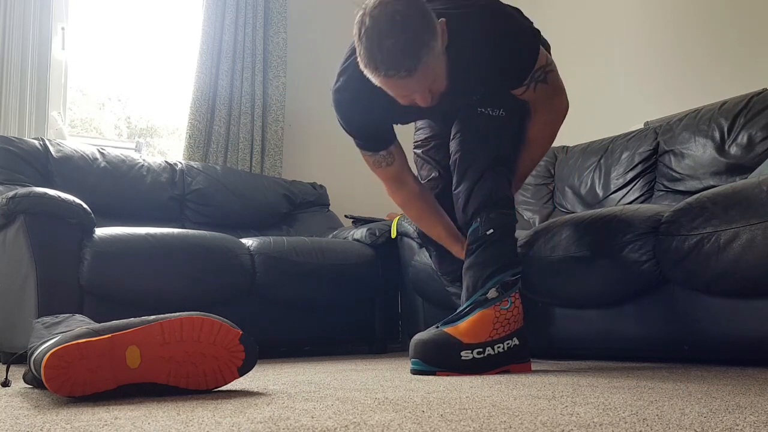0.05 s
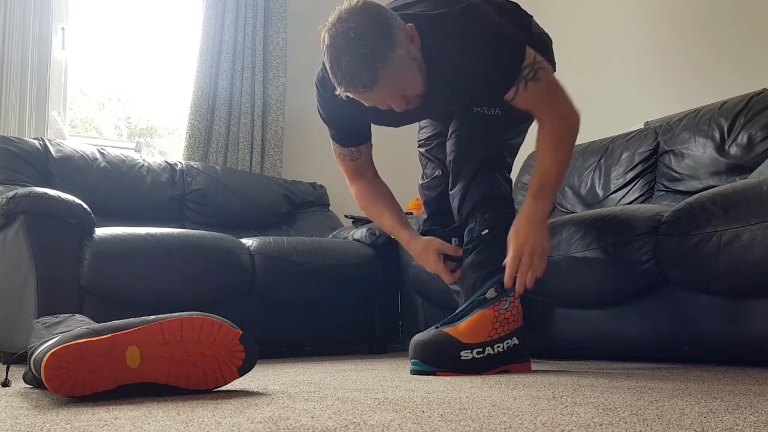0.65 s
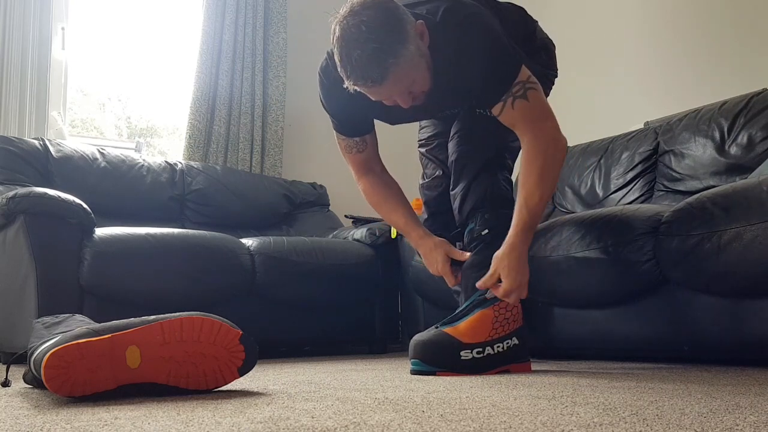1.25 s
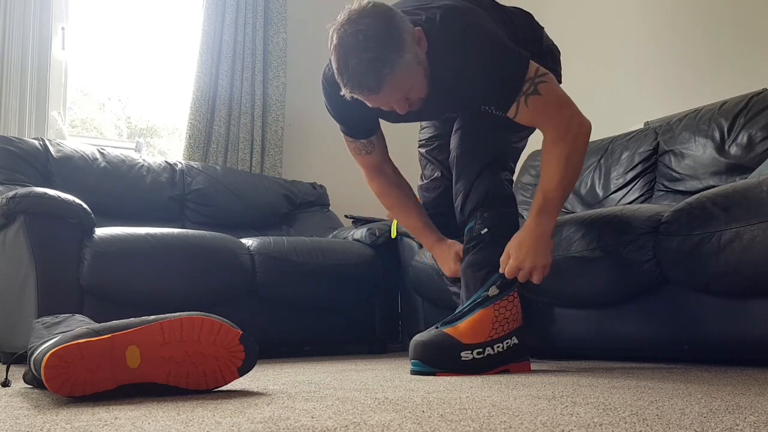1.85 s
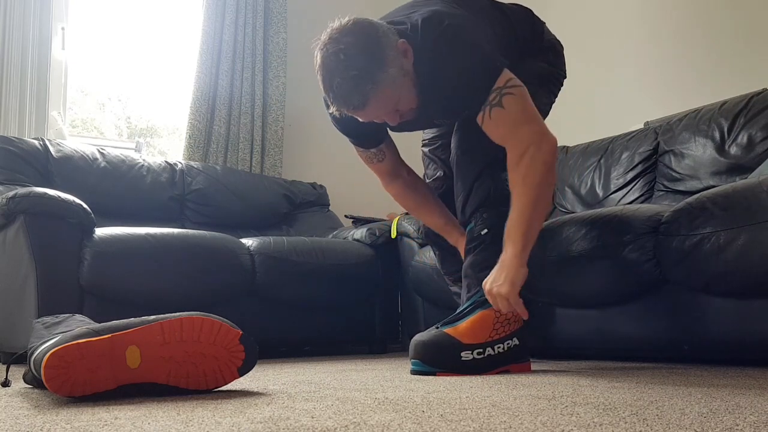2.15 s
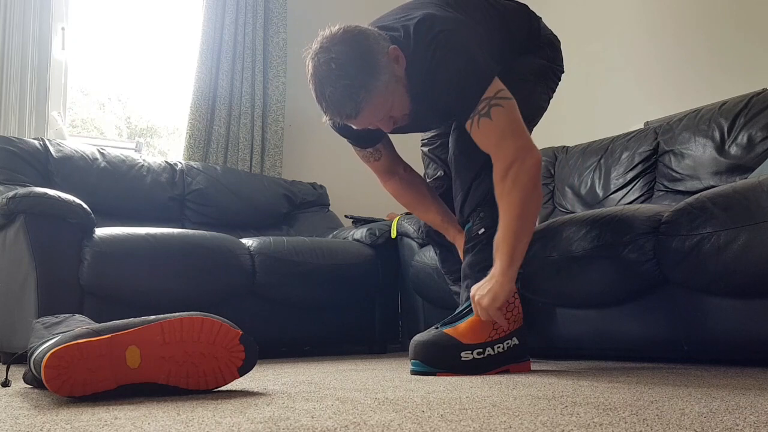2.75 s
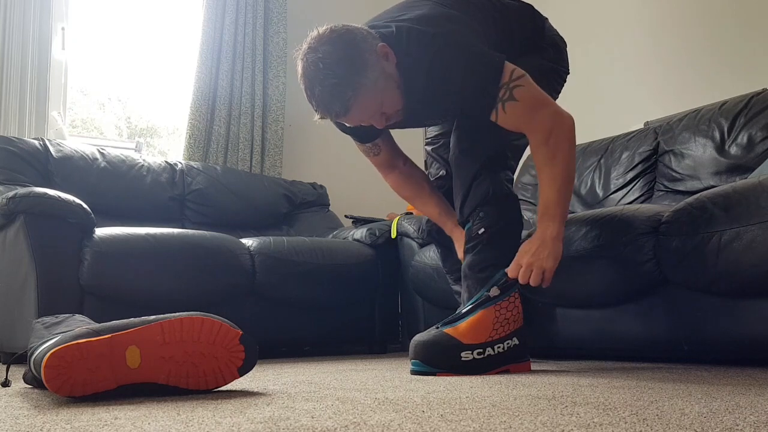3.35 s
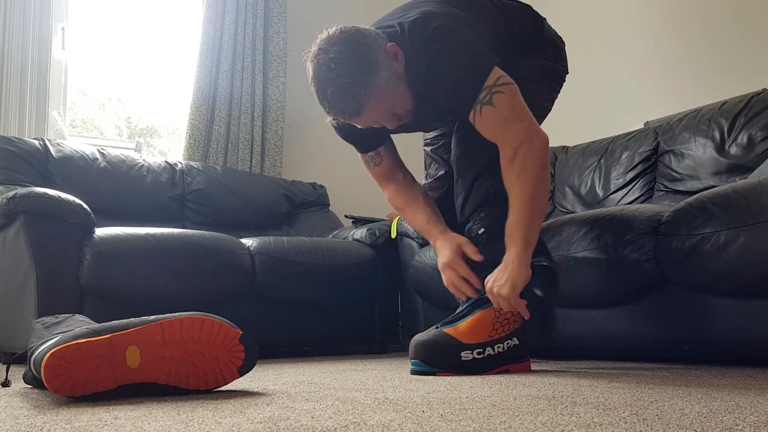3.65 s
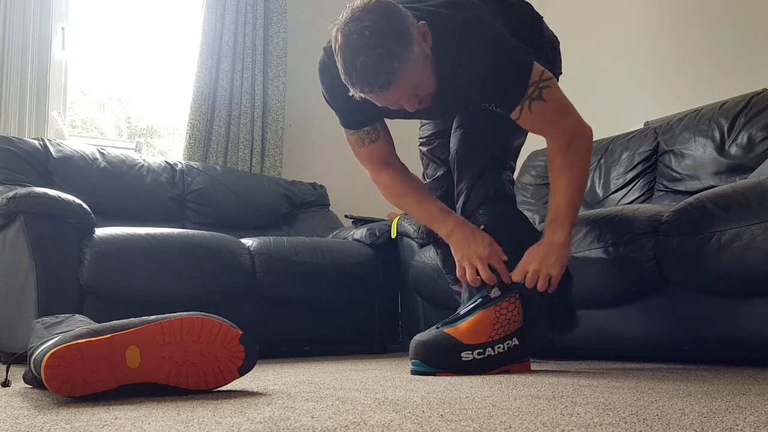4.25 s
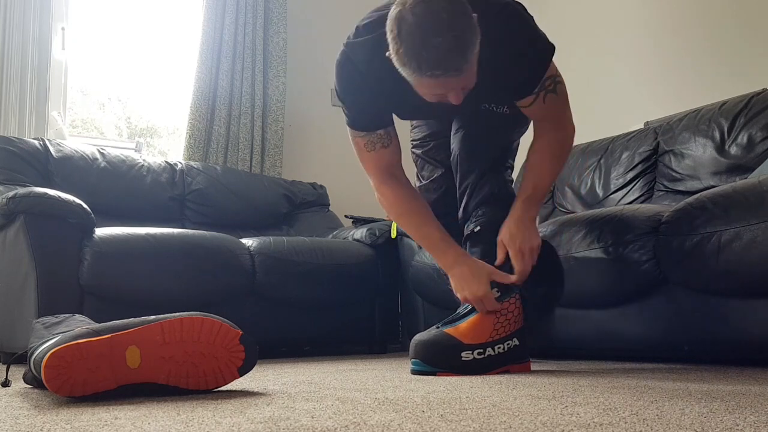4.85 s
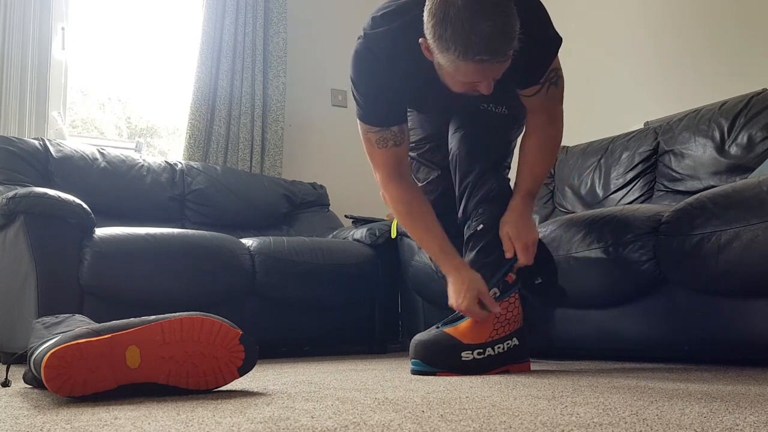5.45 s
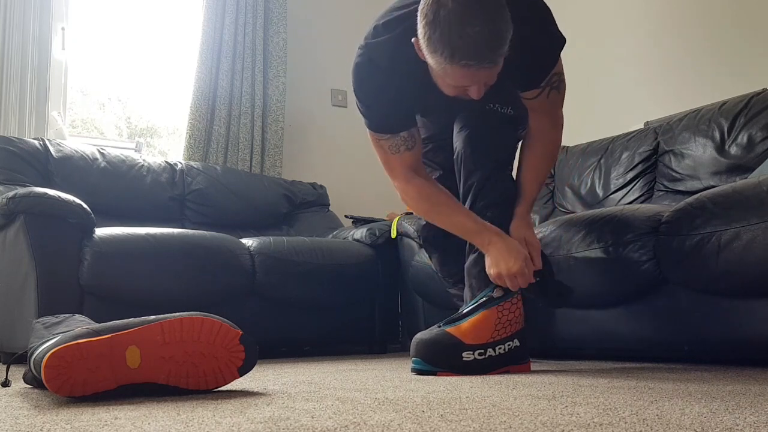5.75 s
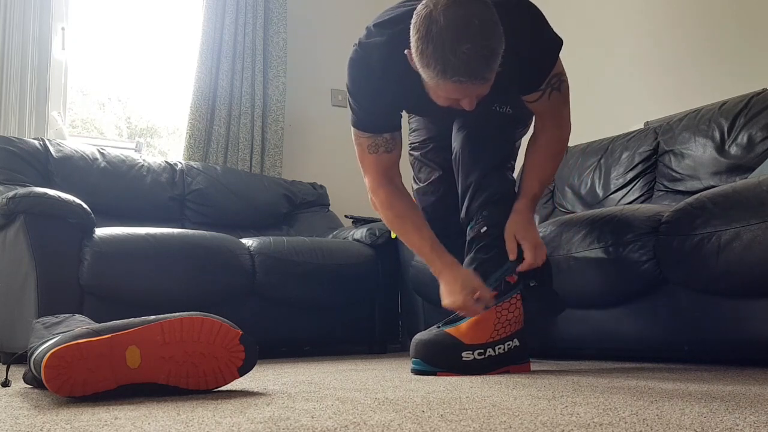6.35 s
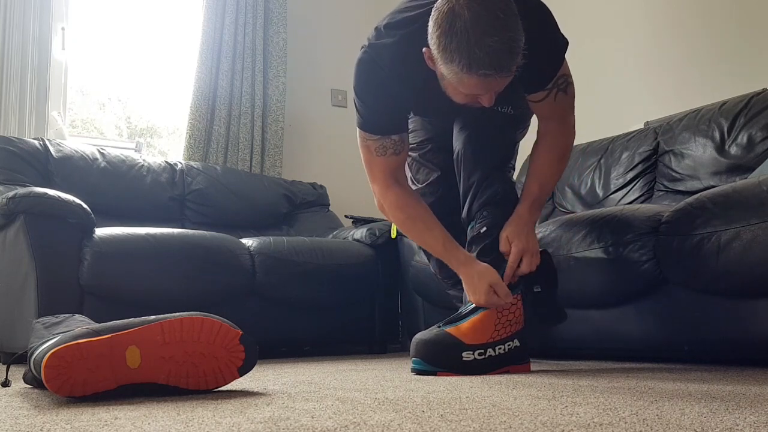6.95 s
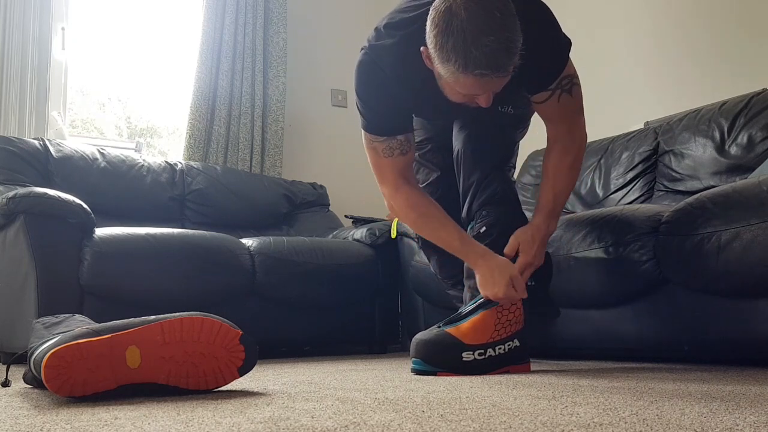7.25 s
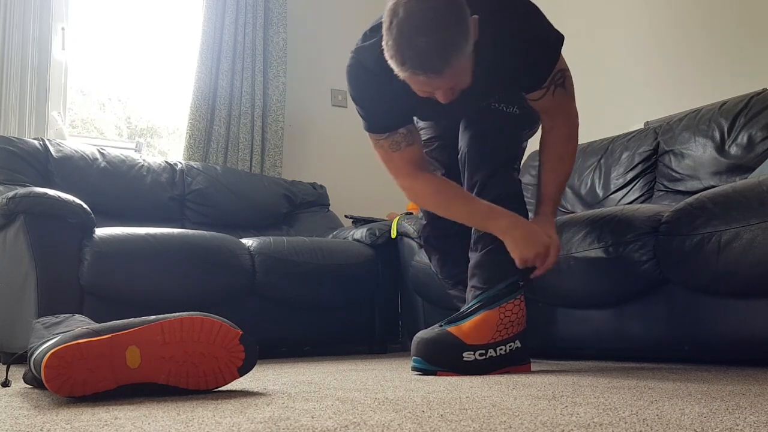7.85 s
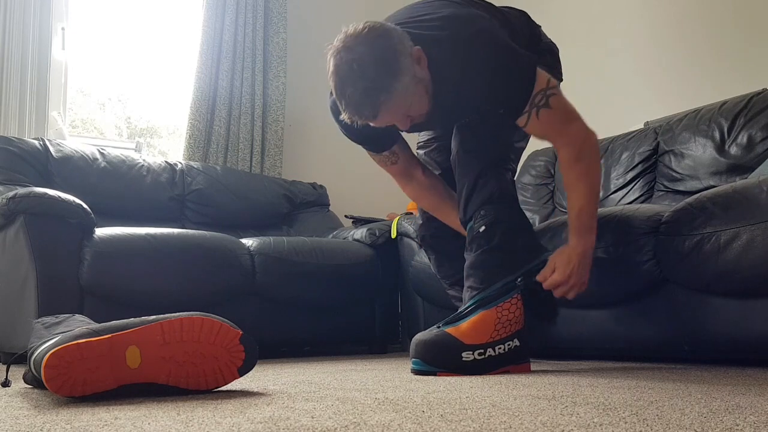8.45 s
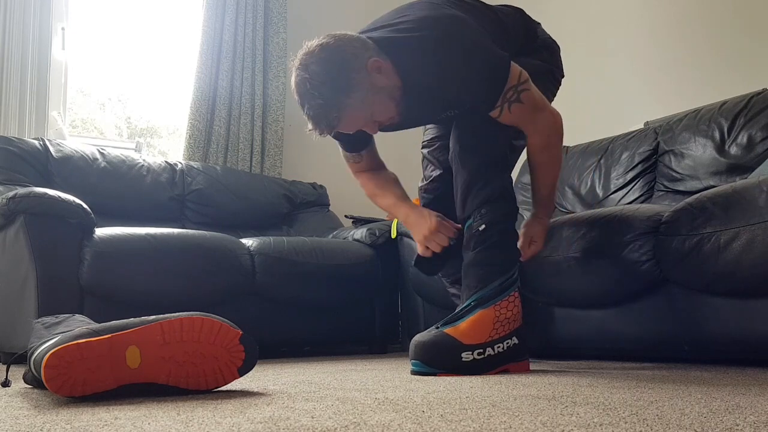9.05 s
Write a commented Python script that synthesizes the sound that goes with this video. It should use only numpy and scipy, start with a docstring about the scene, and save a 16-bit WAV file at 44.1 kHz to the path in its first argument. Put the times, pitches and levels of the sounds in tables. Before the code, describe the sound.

A heavy boot is fastened a step or two from the microphone in a quiet living room, over a faint rumble and thin hiss. Trouser fabric rustles at the start, with a small creak at 0.4 seconds and light finger taps around 1 second. A quieter stretch holds soft taps and tiny zip runs between 1.7 and 2.5 seconds. Short thudding, rasping tugs come from 2.8 to 3.3 seconds, ending with another zip tick. From 3.7 to 5.5 seconds cloth swishes, hands rub and the hollow shell knocks, most clearly near 4.8. Hard tugs with squeaky leather creaks hit at 6.2 seconds, loudest at 6.7, and again around 7.5 with a sharp knock and a low shift of weight. Rustling continues, and from 8.5 to 9 seconds come more tugs, rubbing, low shuffling and a run of groaning creaks.

```python
"""A carpeted living room: someone fastens a heavy mountaineering boot a step or two from the microphone.
Trouser legs and gaiter rustle and swish, with now and then a faint breath; fingers rub and tap the hollow
shell. Foot and body shift against the floor and a leather sofa; boot and sofa leather creak under strain. A zip
ticks in short runs. Hard tugs stick and slip, so the stiff boot judders, thuds and rasps. Under it all lie a
low house rumble and a thin hiss."""
import sys
import numpy as np
from scipy import signal
from scipy.fft import rfft, irfft
from scipy.io import wavfile
from scipy.ndimage import uniform_filter1d

SR = 44100
rng = np.random.default_rng(int(sys.argv[2]) if len(sys.argv) > 2 else 0)


def pcm_store(signal):
    """Save signal as 16-bit PCM."""
    levels = np.round(np.clip(np.atleast_2d(signal), -1, 1) * 32767)
    wavfile.write(sys.argv[1], SR, levels.astype(np.int16).T)


N = 400869


def amp(db):
    return np.exp(np.asarray(db) * (np.log(10) / 20))


def unit_rms(x):
    return x / np.sqrt(np.mean(x ** 2) + 1e-30)


def curve_at(points, hz):
    """Interpolate (f/Hz, value) points over log frequency."""
    points_hz, values = np.transpose(points)
    return np.interp(np.log(hz + 1), np.log(points_hz + 1), values)


def add(mix, t_s, sound):
    part = mix[:, max(round(t_s * SR), 0):][:, :sound.shape[1]]
    part += sound[:, :part.shape[1]]


def at_level(sound, db, length_s):
    """Scale to the energy of db held for length_s."""
    return sound * amp(db) * np.sqrt(length_s * SR / np.sum(sound.mean(0) ** 2))


def colour(x, spectrum, size=4096):
    """Minimum-phase filter: rings after a click, never before."""
    log_gain = np.log(amp(curve_at(spectrum, abs(np.fft.fftfreq(size, 1 / SR)))))
    impulse = np.fft.ifft(np.exp(np.conj(signal.hilbert(log_gain)))).real
    return signal.oaconvolve(np.float32(x), np.float32(impulse[:size // 2]))[:len(x)]


def ring(x, hz, width_hz, bypass=0):
    """One resonance plus a bypassed share of the drive."""
    b, a = signal.iirpeak(hz, max(hz / width_hz, .5), fs=SR)
    return signal.lfilter(b, a, x) + bypass * x


# Stereo width: f/Hz, side over mid/dB
WIDTH_DB = [(60, -15), (200, -17), (400, -12), (700, -6), (1300, -1.5), (2300, 1), (14000, 1)]

def spread(mid, side):
    """Stereo from two unrelated signals: bass near mono, treble wide."""
    side_gain = amp(curve_at(WIDTH_DB, np.fft.rfftfreq(len(side), 1 / SR)))
    side = irfft(rfft(side) * side_gain, len(side))
    return np.array([mid + side, mid - side])


# Room decay: f/Hz, T60/s
ROOM_T60_S = [(60, 0.1), (150, 0.39), (280, 0.44), (600, 0.18), (1400, 0.36), (5000, 0.5), (14000, 0.04)]

def room(x, wet_db, size=10240, build_s=0.00097):
    """Direct sound plus a diffuse tail, new on each call: the paths change as the body moves."""
    hz, t_s, noise = signal.stft(rng.standard_normal((2, size)), SR, nperseg=256)
    decay = amp(-60 * t_s / curve_at(ROOM_T60_S, hz)[:, None])
    tails = signal.istft(noise * decay, SR, nperseg=256)[1]
    tails *= 1 - np.exp(-np.arange(size) / SR / build_s)
    paths = amp(wet_db) * spread(*tails) / np.linalg.norm(tails[0])
    paths[:, 0] += 1
    return signal.oaconvolve(np.float32(x[None]), np.float32(paths), axes=1)[:, :len(x)]


def grains(per_s, spread_db):
    """Tiny random catches and releases, a few far larger than the rest."""
    strength = amp(spread_db * np.minimum(rng.exponential(1, N), 4)) * rng.choice([-1, 1], N)
    return strength * (rng.random(N) < per_s / SR)


def moves(rows, release_s, rise_share=0.55):
    """Gain from rows (t/s, length/s, level/dB): each move gathers speed, holds, settles."""
    t_s = np.arange(0, N, 64) / SR
    start_s, length_s, db = np.transpose(rows)[:, :, None]
    rise = np.clip((t_s - start_s) / (rise_share * length_s), 0, 1)
    settle = np.exp(-np.maximum(t_s - start_s - length_s, 0) / release_s)
    return np.interp(np.arange(N) / SR, t_s, np.linalg.norm(amp(db) * rise * settle, axis=0))


def fidgeting(still_at_s=1.34, resumed_after_s=0.26):
    """Gain of the slight motion between moves; zero while the body holds still."""
    return np.clip(2 * abs(np.arange(N) / SR - still_at_s) / resumed_after_s - 1, 0, 1)


def friction(motion, spectrum, per_s, spread_db, flutter_db, wet_db):
    """Grains under fluttering pressure; four sets of echoes crossfade as the limbs move."""
    pressure = unit_rms(uniform_filter1d(uniform_filter1d(rng.standard_normal(N), 700), 400))
    rub = colour(grains(per_s, spread_db) * amp(flutter_db * pressure), spectrum)
    turns = np.arange(N) / SR * 2
    fades = (np.maximum(np.cos(2 * np.pi * (turns + k / 4)), 0) for k in range(4))
    sound = sum(room(rub * fade, wet_db) for fade in fades)
    power = uniform_filter1d(uniform_filter1d(sound.mean(0) ** 2, 3000), 2000)
    return motion * sound / np.sqrt(abs(power) + 1e-30)  # motion alone sets the slow level


def slips(length_s, per_s, jitter, uneven_db, build_s, release_s=0.006, size=12288):
    """Stick-slip: a half-regular train of jerks that builds, holds and lets go."""
    gaps, strengths = rng.standard_normal((2, size // 40))
    t_s = np.cumsum(np.exp(jitter * gaps)) / per_s
    t_s -= t_s[0]
    force = amp(uneven_db * strengths) * (1 - np.exp(-(t_s + 1 / per_s) / build_s))
    force *= np.exp(-np.maximum(t_s - length_s, 0) / release_s)
    inside = (t_s * SR < size) & (t_s < length_s + 20 * release_s)
    return np.bincount((t_s[inside] * SR).astype(int), force[inside], size)


# Hand strokes, dragging cloth and rubbing the boot: t/s, length/s, cloth/dB, rub/dB
HAND_STROKES = [(-0.03, 0.11, -59, -65), (0.139, 0.18, -57.5, -58), (0.302, 0.14, -54.5, -65.5),
                (0.452, 0.13, -60, -68.5), (0.741, 0.079, -69, -65), (0.9, 0.17, -71.5, -59.5),
                (1.444, 0.14, -82, -68.5), (1.544, 0.2, -70.5, -69.5), (1.85, 0.065, -76, -70),
                (2.02, 0.074, -71.5, -70.5), (2.132, 0.083, -66.5, -80), (2.377, 0.16, -74, -74),
                (2.77, 0.019, -67.5, -71), (3.282, 0.097, -69, -59.5), (3.534, 0.29, -65.5, -76.5),
                (3.755, 0.11, -55, -55.5), (3.86, 0.12, -63.5, -51.5), (3.99, 0.11, -68, -68),
                (4.066, 0.18, -57.5, -53), (4.25, 0.22, -67.5, -72.5), (4.5, 0.11, -57, -62),
                (4.568, 0.19, -58, -58), (4.784, 0.2, -53, -51), (5.013, 0.088, -57.5, -51.5),
                (5.329, 0.34, -64, -70), (5.533, 0.2, -71.5, -64.5), (5.93, 0.13, -66.5, -78),
                (6.226, 0.053, -53, -48.5), (6.406, 0.12, -63, -66), (7.104, 0.14, -62.5, -57),
                (7.273, 0.13, -70, -67), (7.459, 0.27, -55.5, -47), (7.788, 0.11, -54, -55.5),
                (7.978, 0.048, -59, -58.5), (8.112, 0.06, -65, -56), (8.298, 0.2, -66.5, -70.5),
                (8.576, 0.3, -69.5, -52.5), (8.803, 0.28, -59.5, -50)]
# Rustle spectrum: f/Hz, level/dB
CLOTH_DB = [(500, -7), (1500, 1.5), (2500, 2.5), (4000, 2), (6600, 3), (8200, -6), (11000, -3),
            (14500, -7.5)]

def cloth(catches_per_s=22, catch_db=4.5, relax_s=0.055, rest_db=-76):
    """Fibres flick with each stroke and tug; folds catch, flare and relax."""
    slides = [(t_s, length_s, db) for t_s, length_s, db, _ in HAND_STROKES]
    flicks = [(t_s, length_s, -64 + 0.88 * (rasp_db + 46.5)) for t_s, length_s, *_, rasp_db in BOOT_TUGS]
    motion = np.hypot(moves(slides + flicks, release_s=0.064), amp(rest_db) * fidgeting())
    catches = (rng.random(N) < catches_per_s / SR) * rng.random(N)
    strain = signal.lfilter([1], [1, -np.exp(-1 / (relax_s * SR))], catches)
    flare = amp(catch_db * (strain - uniform_filter1d(strain, 5000)))
    mid, side = (unit_rms(colour(grains(per_s=16000, spread_db=1.5) * flare, CLOTH_DB)) for _ in range(2))
    return motion * spread(mid, side)


# Rub spectrum: f/Hz, level/dB
RUB_DB = [(80, -22), (200, 0), (400, -0.5), (650, 2.5), (950, -3.5), (1650, -7.5), (2200, -20.5),
          (7000, -33)]

def hand_rub(rest_db=-80.5):
    """Fingers drag over the boot with each stroke, faintly in between."""
    rubs = [(t_s, length_s, db) for t_s, length_s, _, db in HAND_STROKES]
    motion = np.hypot(moves(rubs, release_s=0.048), amp(rest_db) * fidgeting())
    return friction(motion, RUB_DB, per_s=600, spread_db=4.0, flutter_db=5.0, wet_db=8.0)


# Shifts of foot or body: t/s, length/s, level/dB
WEIGHT_SHIFTS = [(-0.01, 0.052, -56.5), (.425, 0.085, -54), (1.09, 0.016, -58), (2.79, .08, -54),
                 (2.93, 0.034, -56), (3.22, 0.15, -55.5), (4.73, 0.063, -55), (5.09, 0.13, -59),
                 (5.51, 0.08, -59), (6.235, 0.11, -59.5), (6.7, 0.19, -56), (7.5, 0.24, -46.5),
                 (8.44, 0.15, -56.5), (8.64, 0.35, -45)]
# Shift spectrum: f/Hz, level/dB
WEIGHT_DB = [(15, -17), (35, -12.5), (58, -0.5), (135, -2), (200, -12.5), (400, -25), (1200, -67)]

def weight_shifts(lean_db=-9):
    """Low friction on floor and sofa as the body shifts or leans into a stroke."""
    leans = [(t_s, length_s, rub_db + lean_db) for t_s, length_s, _, rub_db in HAND_STROKES]
    motion = moves(WEIGHT_SHIFTS + leans, release_s=0.085)
    return friction(motion, WEIGHT_DB, per_s=460, spread_db=2.0, flutter_db=2.5, wet_db=2.5)


# Background spectrum: f/Hz, level/dB
ROOM_TONE_DB = [(15, -37), (28, 2), (85, 4.5), (350, -12), (700, -13), (2000, -20.5), (4500, -24.5),
                (7000, -17), (8300, -27.5), (12400, -14), (14500, -16)]

def room_tone(db=-70.5):
    """Low house rumble and thin hiss."""
    mid, side = (unit_rms(colour(noise, ROOM_TONE_DB)) for noise in rng.standard_normal((2, N)))
    return amp(db) * spread(mid, side)


# Taps of fingers and fittings: t/s, level/dB, f/Hz, bandwidth/Hz
SHELL_TAPS = [(.423, -48.5, 270, 150), (0.782, -52, 587, 150), (0.9609, -50, 1170, 620),
              (0.9914, -45.5, 1120, 600), (0.9973, -42.5, 890, 600), (1.508, -58.5, 630, 250),
              (1.5784, -53.5, 590, 200), (1.746, -53, 626, 140), (1.777, -55.5, 700, 220),
              (2.0307, -60.5, 530, 200), (2.059, -57, 650, 160), (2.311, -64.5, 850, 300),
              (3.475, -57, 730, 200), (3.8435, -44.5, 600, 130), (3.953, -44, 740, 250),
              (4.633, -45.5, 1090, 600), (4.7287, -37, 810, 503), (4.8314, -31.5, 696, 420),
              (5.0357, -42.5, 920, 700), (5.5184, -38.5, 670, 224), (6.595, -55, 540, 121),
              (6.67, -44, 570, 110), (6.81, -37, 615, 450), (7.1468, -48.5, 430, 504),
              (7.485, -45, 260, 70), (7.51, -42.5, 594, 200), (7.539, -42, 650, 300),
              (7.5634, -30.5, 910, 600), (8.0215, -48, 900, 714), (8.1223, -50.5, 272, 60.4),
              (8.481, -41, 298, 152), (8.628, -43, 290, 160), (8.865, -44.5, 960, 600)]
# Blow spectrum: f/Hz, level/dB
BLOW_DB = [(60, 1), (250, 0), (600, 3), (1400, -3.5), (2100, -9.5), (5000, -25.5), (14000, -36.5)]

def taps(cutoff_ratio=2.56):
    """Soft blows on the shell: a dull click where damped, a hollow ring where free."""
    out = np.zeros((2, N))
    blow = colour(signal.unit_impulse(6144), BLOW_DB)
    for t_s, db, hz, width_hz in SHELL_TAPS:
        knock = ring(blow, hz, width_hz, bypass=.5 * width_hz / hz)
        soft_contact = signal.butter(4, min(cutoff_ratio * hz, SR / 4), fs=SR)
        tap = room(signal.lfilter(*soft_contact, knock), wet_db=-1.0)
        add(out, t_s, at_level(tap, db, length_s=0.0055))
    return out


# Boot and sofa creaks: t/s, length/s, level/dB, start f/Hz, end f/Hz, overtone slope/(dB/octave)
LEATHER_CREAKS = [(.423, 0.057, -54, 207, 105, -8.5), (2.982, 0.076, -52, 134.8, 104.5, -11),
                  (3.891, 0.019, -49.5, 189, 163, -4.5), (4.036, 0.046, -55, 336, 155, -8.5),
                  (4.271, 0.13, -63, 396, 452, -13), (6.244, 0.014, -30, 700, 620, -12.5),
                  (6.257, 0.041, -40, 272.7, 247, -7), (6.271, 0.019, -30, 530, 492, -20),
                  (6.7012, 0.021, -27, 681, 614, -15.5), (6.72, 0.027, -28.5, 292, 259.6, -10),
                  (7.567, 0.018, -33.5, 330, 235, -10), (7.612, 0.04, -41, 207, 175, -16),
                  (7.65, 0.072, -43, 185.5, 149, -24), (8.626, 0.051, -44.5, 248.5, 153, -11),
                  (8.698, 0.054, -30.5, 236, 225, -6.5), (8.757, 0.025, -31, 159, 163, -11.5),
                  (8.795, 0.031, -36, 184, 125.5, -8), (8.858, 0.048, -36, 179, 169, -20),
                  (8.92, 0.044, -45, 182.3, 187.3, -1.5), (8.935, 0.075, -40.5, 159.6, 181, -10.5),
                  (9.03, 0.035, -38.5, 212.4, 218, -11)]
# Leather response: f/Hz, gain/dB
LEATHER_DB = [(1350, 5), (2200, -22), (6000, -25.5)]

def creaks(waver_share=0.029):
    """Under steady pull the slips fall into step: a groan or squeak whose pitch follows the strain."""
    out = np.zeros((2, N))
    order = np.arange(1, 11)[:, None]
    for t_s, length_s, db, start_hz, end_hz, slope_db in LEATHER_CREAKS:
        count = int(length_s * SR)
        waver = unit_rms(uniform_filter1d(rng.standard_normal(SR // 4), 160))[:count]
        slip_hz = np.linspace(start_hz, end_hz, count) * (1 + waver_share * waver)
        turns = np.cumsum(slip_hz) / SR
        partials = np.cos(2 * np.pi * (order * turns + rng.random(order.shape)))
        judder = np.sum(amp(slope_db * np.log2(order)) * partials, axis=0)
        judder *= signal.windows.tukey(count, .45)
        creak = colour(np.pad(judder, (0, SR // 4)), LEATHER_DB)
        add(out, t_s, at_level(room(creak, wet_db=-7.0), db, length_s))
    return out


# Airy swishes and faint breath: t/s, length/s, level/dB, start f/Hz, end f/Hz, half bandwidth/Hz
AIRY_SWISHES = [(0.795, 0.047, -63, 1200, 1400, 350), (2.772, 0.044, -64.5, 1930, 3960, 295),
                (3.827, 0.14, -54, 2500, 2870, 330), (3.915, 0.098, -59, 1870, 1850, 80),
                (5.068, 0.046, -52.5, 1140, 1550, 380), (7.152, .11, -63, 2680, 2810, 340),
                (7.26, 0.15, -75, 1920, 2000, 90), (8.017, 0.042, -55, 1390, 1520, 300),
                (8.591, 0.044, -60.5, 11600, 11900, 600), (8.691, 0.082, -54, 2200, 2200, 270)]

def swishes():
    """Airy hiss whose pitch glides: narrow in a squeak or a faint breath, wide in a scuff."""
    out = np.zeros((2, N))
    for t_s, length_s, db, start_hz, end_hz, blur_hz in AIRY_SWISHES:
        count = int(length_s * SR)
        carrier = np.exp(2j * np.pi * np.cumsum(np.linspace(start_hz, end_hz, count)) / SR)
        blur = signal.butter(3, blur_hz, fs=SR)
        baseband = signal.lfilter(*blur, rng.standard_normal(count) / carrier)
        hiss = (carrier * baseband).real * signal.windows.tukey(count, .7)
        swish = room(np.pad(hiss, (0, SR // 4)), wet_db=-4.0)
        add(out, t_s, at_level(swish, db, length_s))
    return out


# Zip runs: t/s, length/s, level/dB
ZIP_RUNS = [(1.70, 0.042, -61.5), (2.107, 0.023, -58.5), (2.411, 0.13, -66.5), (3.294, 0.018, -54.5)]
# Tooth spectrum: f/Hz, level/dB
TEETH_DB = [(1000, -34), (3600, -22), (5000, 1), (6700, 4), (8000, -10), (14000, -38)]

def zip_runs():
    """The slider ticks over fine teeth."""
    out = np.zeros((2, N))
    for t_s, length_s, db in ZIP_RUNS:
        ticks = slips(length_s, per_s=500, jitter=0.36, uneven_db=4, build_s=0.0038)
        run = room(colour(ticks, TEETH_DB), wet_db=-10.0)
        add(out, t_s, at_level(run, db, length_s))
    return out


# Tugs: t/s, length/s, thud/dB, thud f/Hz, shell/dB, rasp/dB
BOOT_TUGS = [(2.79, 0.023, -46, 179, -51.5, -53), (2.92, 0.02, -39, 200, -43, -49),
             (2.952, 0.023, -38.5, 266, -48, -51), (3.212, 0.048, -51.5, 187, -52.5, -63.5),
             (3.286, 0.037, -39, 234, -48.5, -52.5), (6.24, 0.022, -43, 259, -38.5, -43),
             (6.261, 0.027, -37.5, 244, -36.5, -45), (6.3, 0.02, -40.5, 244, -42, -52),
             (6.697, 0.017, -34, 283, -27.5, -41), (6.714, 0.018, -31.5, 265, -32, -38.5),
             (6.805, 0.0079, -33.5, 182, -40, -67), (7.505, 0.052, -43.5, 265, -53, -75),
             (7.557, 0.029, -34, 287, -34.5, -39.5), (7.601, 0.053, -42.5, 175, -41, -46.5),
             (7.735, 0.032, -48, 134, -52, -48.5), (8.674, 0.04, -37.5, 186, -37, -44.5),
             (8.699, 0.046, -35, 229, -46, -42.5), (8.899, 0.07, -42, 282, -51, -62)]
# Responses of hollow boot, stiff shell and rough surface: f/Hz, gain/dB
THUD_DB = [(25, -30.5), (60, -7.5), (110, -4.5), (170, 3), (290, -1), (390, 0), (700, -33.5), (2000, -88)]
SHELL_DB = [(200, -26), (400, -19.5), (500, 2), (700, 5.5), (900, -13), (1400, -31), (3000, -98)]
RASP_DB = [(550, -43.5), (950, 1), (1350, 1), (1680, -7), (2000, -17), (3000, -21.5), (6000, -31.5)]
# Shell modes: f/Hz, bandwidth/Hz, gain/dB
SHELL_RESONANCES = [(472.6, 18, 10.5), (538, 43, -0.5), (614, 16, -1.5), (651, 27, -2), (707, 40, -4),
                    (772, 29, -4.5), (845, 23, 4.5), (960, 27, -5.5)]

def tugs():
    """One train of slips per tug shakes the hollow boot, its shell and its surface."""
    out = np.zeros((2, N))
    for t_s, length_s, thud_db, thud_hz, shell_db, rasp_db in BOOT_TUGS:
        jerks = slips(length_s, per_s=600, jitter=.6, uneven_db=1.5, build_s=0.0047)
        jerks -= signal.lfilter([.01], [1, -.99], jerks)  # steady pull is silent
        thud = room(ring(colour(jerks, THUD_DB), thud_hz, width_hz=35, bypass=0.42), wet_db=-7.5)
        drive = colour(jerks, SHELL_DB)
        modes = sum(amp(db) * ring(drive, hz, width_hz) for hz, width_hz, db in SHELL_RESONANCES)
        shell = room(modes + 0.57 * drive, wet_db=-5.5)
        rasp = room(colour(jerks, RASP_DB), wet_db=-2.0)
        for sound, db in (thud, thud_db), (shell, shell_db), (rasp, rasp_db):
            add(out, t_s, at_level(sound, db, length_s))
    return out


# Room modes: f/Hz, bandwidth/Hz, gain/dB
ROOM_MODES = [(152.3, 4.4, -9), (286.4, 18, 3), (310.4, 13, -7.5), (359, 14.6, 2), (420, 82, -5.5),
              (505, 12.6, -5.5), (573, 16, -5.5)]

def standing_waves(x):
    """Low notes swell or cancel at the microphone."""
    for hz, width_hz, db in ROOM_MODES:
        x = x + (amp(db) - 1) * ring(x, hz, width_hz)
    return x


def scene():
    """Boot, cloth and zip over the room tone."""
    boot = standing_waves(hand_rub() + weight_shifts() + taps() + creaks() + tugs())
    return cloth() + boot + room_tone() + swishes() + zip_runs()


def record(dry, left_lag_s=5e-5, cutoff_hz=14560):
    """Two microphone ports, the left slightly late, each favouring its own bands; then a low-pass."""
    hz = np.fft.rfftfreq(N, 1 / SR)
    # f/Hz, left over right/dB
    balance_db = curve_at([(250, 2.7), (1200, 3.0), (2600, 3.0), (4400, -1.5), (6000, -5.0),
                           (8000, 7.0), (11000, 4.0), (14000, 0.5)], hz)
    lag = np.exp(-2j * np.pi * hz * left_lag_s)
    ports = irfft(rfft(dry) * np.array([amp(balance_db / 2) * lag, amp(-balance_db / 2)]), N)
    lowpass = signal.firwin(801, cutoff_hz, window=("kaiser", 9), fs=SR)
    return signal.oaconvolve(ports, lowpass[None], "same")


dry = scene()
out = record(dry)
pcm_store(out)
```